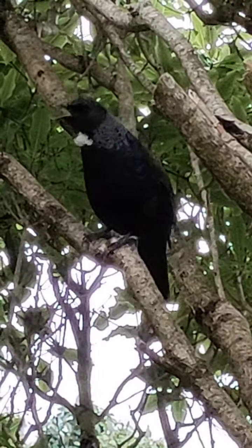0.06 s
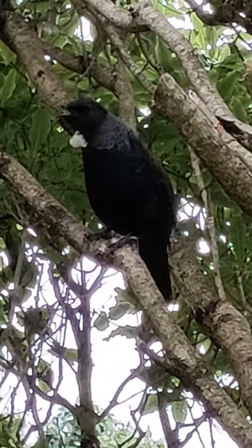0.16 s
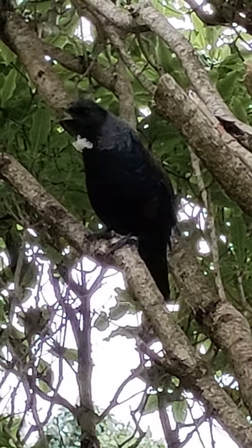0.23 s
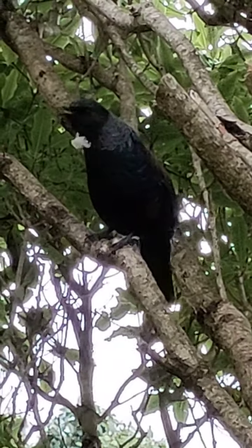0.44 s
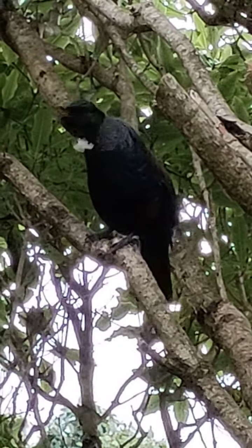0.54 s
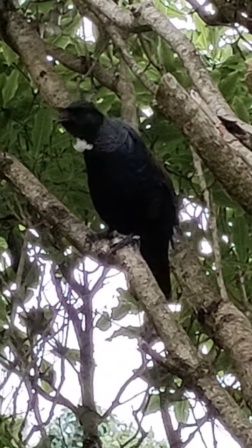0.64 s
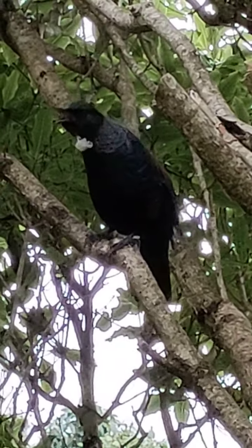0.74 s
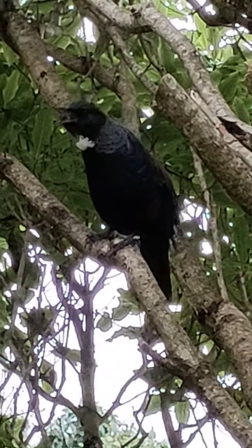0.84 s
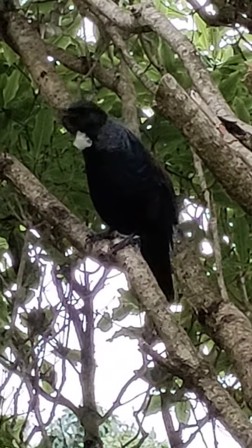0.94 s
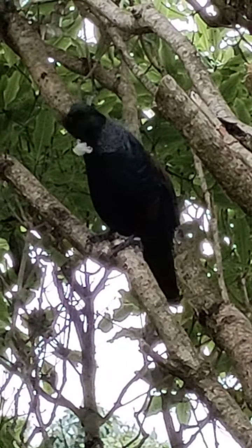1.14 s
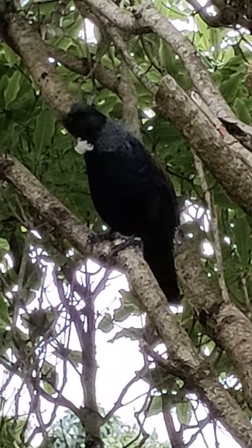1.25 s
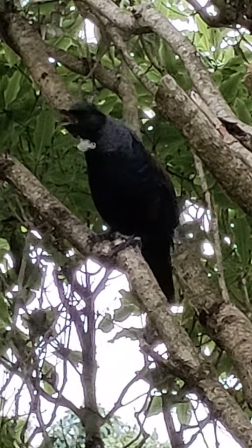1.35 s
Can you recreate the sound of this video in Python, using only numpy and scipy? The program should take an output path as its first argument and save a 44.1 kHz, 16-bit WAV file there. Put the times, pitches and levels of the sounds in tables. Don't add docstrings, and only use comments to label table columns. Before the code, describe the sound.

A perched songbird sings close to a stereo microphone: tiny peeps, a falling sweep, a raspy trilled buzz, gliding flute-like whistles, a bright piercing downward sweep, then two gulps, with short woodland echoes over very faint hush.

```python
import sys
import numpy as np
from scipy import signal
from scipy.fft import rfft, irfft, next_fast_len
from scipy.io import wavfile
from scipy.ndimage import uniform_filter1d

SR = 44100
rng = np.random.default_rng(int(sys.argv[2]) if len(sys.argv) > 2 else 0)


def linear_from_db(decibels):
    return 10 ** (np.asarray(decibels, float) / 20)


def wrap_up_sound(samples):
    columns = np.atleast_2d(samples).T
    tamed = np.clip(columns, -1, 1)
    steps = np.round(tamed * 32767).astype(np.int16)
    wavfile.write(sys.argv[1], SR, steps)


N = 61739


def evened(x):
    return x / np.sqrt(np.mean(x ** 2) + 1e-20)


def read(points, hz):
    point_hz, value = np.transpose(points)
    return np.interp(np.log(hz + 1), np.log(point_hz + 1), value)


def coloured(x, points):
    hz = np.fft.rfftfreq(N, 1 / SR)
    return irfft(rfft(x) * linear_from_db(read(points, hz)), N)


def wobble(hz):
    lowpass = signal.butter(4, hz / (SR / 2), output="sos")
    return evened(signal.sosfilt(lowpass, rng.standard_normal(N)))


# (frequency [Hz], level [dB])
HUSH_SPECTRUM = [(25, -23), (150, -7.5), (340, -13.5), (700, -19), (3200, -26.5), (6500, -23.5),
                 (8500, -47), (15000, -45)]
# (frequency [Hz], correlation [0-1])
HUSH_LIKENESS = [(30, 0.43), (120, 0.17), (400, 0.24), (1500, 0.1), (8000, .1)]
# (time [s], level [dB])
HUSH_SWELL = [(0, -7.5), (0.302, 0.5), (0.701, 2.5), (1.152, 4.5), (1.4, -4.5)]
HUSH_DB, PATCH_DB = -77.5, 1.8


def hush():
    frames, hz = N // 256 + 5, np.fft.rfftfreq(1024, 1 / SR)
    a, b, c, d, patches = rng.standard_normal((frames, 513, 5)).T
    patches = uniform_filter1d(patches, size=8, axis=0)
    patches = evened(uniform_filter1d(patches, size=20, axis=1))
    same = np.clip(read(HUSH_LIKENESS, hz), -1, 1)[:, None]
    left = a + 1j * b
    right = same * left + np.sqrt(1 - same ** 2) * (c + 1j * d)
    z = np.array([left, right]) * linear_from_db(read(HUSH_SPECTRUM, hz)[:, None] + PATCH_DB * patches)
    noise = evened(signal.istft(z, nperseg=1024, noverlap=768)[1][:, :N])
    swell_db = np.interp(np.arange(N) / SR, *np.transpose(HUSH_SWELL))
    return noise * linear_from_db(HUSH_DB + swell_db)


# (frequency [Hz], left minus right [dB])
SHADOW = [(1000, -0.5), (3300, -2.5), (6500, -8), (9000, 0)]


def later(x, delay_s, lean=0):
    size = next_fast_len(N + 4096)
    hz = np.fft.rfftfreq(size, 1 / SR)
    turn = np.exp(-2j * np.pi * hz * delay_s)
    return irfft(rfft(x, size) * turn * linear_from_db(lean * read(SHADOW, hz)), size)[:N]


# (frequency [Hz], gain [dB])
SCATTER = [(700, -3.5), (2500, -4), (4000, -0.5), (6000, 0), (12000, -8)]
# (frequency [Hz], t60 [s])
TREES_T60 = [(500, 0.21), (3000, 0.28), (6000, 0.3), (9000, 0.27), (14000, 0.18)]
# (left delay [s], right delay [s], level [dB])
TRUNKS = [
    (.0064, .0062, -4),
    (.0118, .0105, -8),
    (.021, .023, -13),
]
TREES_DB, GAP_S = -1, 0.008


def trees(song):
    x = coloured(song, SCATTER)
    taps = rng.standard_normal((2, SR // 2))
    hz, t, z = signal.stft(taps, SR, nperseg=128)
    decay = linear_from_db(-60 * t / read(TREES_T60, hz)[:, None])
    tail = signal.istft(z * decay, SR, nperseg=128)[1]
    tail = tail / np.linalg.norm(tail[0])
    wet = signal.fftconvolve(later(x, GAP_S)[None], tail, axes=1)[:, :N]
    near = sum(linear_from_db(db) * np.array([later(x, left_s), later(x, right_s)]) for left_s, right_s, db in TRUNKS)
    return linear_from_db(TREES_DB) * wet + near


def direct(song):
    lag_s = 2.2e-5
    return np.array([later(song, 0, 0.5), later(song, lag_s, -0.5)])


def columns(table, edge_s=0.0016):
    s, *rest = np.transpose(table)
    t = np.arange(N) / SR
    to_edge_s = np.minimum(t - s[0] + edge_s, s[-1] + edge_s - t)
    gate = np.clip(to_edge_s / edge_s, 0, 1) ** 2
    return [uniform_filter1d(np.interp(t, s, c), size=130) for c in rest], gate


CLEAN_DB, CLEAN_JITTER = 0.6, 0.001
ROUGH_DB, ROUGH_JITTER = 3.0, 0.008
BREATHY = 0.55
TOP_JITTER = 0.03


def whistle(table, over_db, rough_db=CLEAN_DB, jitter=CLEAN_JITTER, edge_s=0.0046, breathy=0):
    (hz, db), gate = columns(table, edge_s)
    turn = 2 * np.pi * np.cumsum(hz * (1 + jitter * wobble(400))) / SR
    over = 0
    for k, partial_db in enumerate(over_db, 2):
        over = over + linear_from_db(partial_db) * np.sin(k * turn) * (k * hz < SR / 2.2)
    tone = np.sin(turn) + over * (1 - breathy + breathy * wobble(800))
    return np.sqrt(2) * gate * linear_from_db(db + rough_db * wobble(190)) * tone


# (time [s], frequency [Hz], level [dB], length [s])
PUFFS = [
    (0.59, 389, -72, 0.03),
    (1.031, 333, -67.5, 0.07),
]


def puffs():
    t = np.arange(N) / SR
    out = np.zeros(N)
    for s, hz, db, length_s in PUFFS:
        arch = np.sin(np.pi * np.clip((t - s) / length_s, 0, 1))
        out = out + linear_from_db(db) * arch * np.sin(2 * np.pi * hz * t + wobble(75))
    return out


# (time [s], pitch [Hz], level [dB])
STROKE = [(1.066, 3870, -75), (1.073, 4340, -62.5), (1.081, 4930, -71)]
BURST = [(1.14, 5200, -54), (1.146, 4905, -57.5), (1.153, 4140, -56)]


def sparks():
    return whistle(STROKE, []) + whistle(BURST, [], ROUGH_DB, TOP_JITTER)


# (time [s], pitch [Hz], first partial [dB], second partial [dB])
GULP_1 = [(1.07, 1367, -108, -76), (1.08, 1590, -87, -66), (1.102, 1701, -71.5, -43),
          (1.112, 1082, -58.5, -49), (1.115, 1000, -51, -104), (1.118, 731, -57.5, -78)]
GULP_2 = [(1.128, 1405, -103, -52.5), (1.136, 1643, -70, -47), (1.147, 1713, -74, -43),
          (1.152, 1279, -57.5, -50), (1.156, 1055, -47.5, -100), (1.168, 558, -58, -103)]
GULP_THIRD_DB = [-15, -14]
GULP_OVER_DB = [-34, -38, -33, -29, -32]
GULP_BREATHY = 0.35


def gulp(table, third_db):
    (hz, first_db, second_db), gate = columns(table)
    turn = 2 * np.pi * np.cumsum(hz) / SR
    over_db = [third_db, *GULP_OVER_DB]
    over = sum(linear_from_db(db) * np.sin(k * turn) for k, db in enumerate(over_db, 3))
    upper = np.sin(2 * turn) + over * (1 - GULP_BREATHY + GULP_BREATHY * wobble(600))
    return np.sqrt(2) * gate * (linear_from_db(first_db) * np.sin(turn) + linear_from_db(second_db) * upper)


# (time [s], pitch [Hz], low band [dB], high band [dB])
BUZZ = [(.337, 2482, -53.5, -64), (.356, 2489, -50, -52), (.4, 2428, -47, -51), (.45, 2436, -51.5, -54.5),
        (.5, 2443, -50.5, -49), (.522, 2472, -51.5, -70.5), (.535, 2516, -88, -67)]
# (start [s], low band lift [dB], high band lift [dB])
BEATS = [(0.334, -2, -4.5), (.365, 1.5, -0.5), (.394, -1, 1.5), (.426, 3, -1), (0.456, -1, 3),
         (.487, 0, -1), (0.513, 3.5, 5), (.545, -2, -2)]
# (multiple of pitch [1], level re high band [dB])
BUZZ_TOP = [(3.6, -6), (4, -16.5), (4.6, -16.5), (5, -22), (6, -34.5)]
BUZZ_JITTER = 0.019
TRILL_DEPTH, TRILL_DB, FLICKER_DB = 0.08, 8, 3.8
LATE = 2.4


def buzz():
    (hz, low_db, high_db), gate = columns(BUZZ)
    s, low_lift, high_lift = np.transpose(BEATS)
    count = np.interp(np.arange(N) / SR, s, np.arange(len(s)))
    beat, which = count % 1, count.astype(int)
    sag = TRILL_DEPTH * uniform_filter1d(0.5 - beat, size=200)
    low_turn = 2 * np.pi * np.cumsum(hz * (1 + sag + BUZZ_JITTER * wobble(138))) / SR
    top_turn = 2 * np.pi * np.cumsum(hz * (1 + sag + TOP_JITTER * wobble(138))) / SR
    swell_db = TRILL_DB * np.sin(np.pi * beat ** LATE)
    low_db = low_db + low_lift[which] + swell_db - 5.5 + FLICKER_DB * wobble(230)
    high_db = high_db + high_lift[which] - swell_db + FLICKER_DB * wobble(620)
    partials = sum(linear_from_db(db - 5.5) * np.sin(k * top_turn) for k, db in BUZZ_TOP)
    top = np.sin(3 * top_turn) + linear_from_db(0.67 * swell_db) * partials
    return gate * (linear_from_db(low_db) * np.sin(2 * low_turn) + linear_from_db(high_db) * top)


# (time [s], pitch [Hz], level [dB])
WISP_1 = [(0, 4000, -76.5), (.014, 3854, -72), (.03, 3905, -80.5), (.042, 3640, -88)]
WISP_2 = [(0.15, 3840, -88), (0.168, 4130, -77.5), (0.18, 4310, -69.5), (0.19, 3970, -95)]
FLUTE = [(0.62, 3070, -91), (0.636, 3370, -62), (0.642, 3283, -57), (0.702, 3351, -48),
         (0.712, 3394, -63.5), (0.73, 3860, -55), (0.742, 4100, -73.5)]
GLIDE = [(.734, 1945, -83.5), (.746, 2300, -56.5), (.758, 2414, -58), (.822, 2407, -62.5), (.87, 2201, -62),
         (.915, 2182, -56), (.935, 2060, -63), (.96, 1798, -63.5), (.978, 1659, -72.5)]
FAINT = [(.635, 3760, -76.5), (.66, 3910, -76), (.7, 4070, -76.5), (.715, 4600, -92.5)]
# (time [s], level [dB])
GLIDE_SECOND = [(.745, -5.5), (.77, -14.5), (.82, 4), (.86, -3.5), (.9, 1), (.93, -2.5), (.945, 2.5),
                (.98, -7)]


def low_side():
    second_db = np.interp(np.arange(N) / SR, *np.transpose(GLIDE_SECOND))
    wisps = whistle(WISP_1, [-3, -8]) + whistle(WISP_2, [-6, -30])
    flute = whistle(FLUTE, [-35, -35, -30]) + whistle(FAINT, [], ROUGH_DB, TOP_JITTER)
    return wisps + flute + whistle(GLIDE, [second_db, -19, -30, -30, -40])


# (time [s], pitch [Hz], level [dB])
PEEP = [(.043, 6550, -56.5), (.05, 6580, -51), (.056, 6480, -52), (.061, 5920, -67.5), (.075, 5810, -94)]
PEEP_ECHO = [(0.082, 6500, -84), (0.094, 6620, -67), (0.1, 6120, -84.5)]
MURMUR = [(0.087, 4770, -100), (0.095, 4610, -74), (0.115, 4330, -101)]
SWEEP_1 = [(.189, 7180, -80), (.198, 6620, -60.5), (.214, 6290, -46), (.224, 5770, -46.5),
           (.236, 4915, -45.5), (.248, 4890, -47), (.258, 4530, -61.5), (.272, 4130, -63.5)]
SWEEP_SOFT = [(.304, 6400, -77), (.313, 6000, -62.5), (.322, 5150, -59), (.332, 5000, -57)]
CLIMB = [(.618, 4450, -74), (.65, 5410, -53), (.672, 5590, -51), (.69, 5990, -50), (.708, 6530, -62.5),
         (.72, 7480, -75.5), (.74, 8300, -83.5)]
SHRILL = [(.735, 8600, -86.5), (.749, 8430, -65), (.769, 8700, -61.5), (.803, 8500, -64.5),
          (.812, 8600, -69.5)]
CREST = [(.8, 9140, -95.5), (.816, 10200, -64.5), (.838, 9920, -80), (.85, 9070, -58.5),
         (.875, 8875, -50.5), (.895, 8840, -44), (.905, 8650, -76)]
SWEEP_2 = [(.905, 9000, -72.5), (.913, 8870, -43.5), (.925, 8270, -50.5), (.941, 7400, -41.5),
           (.951, 7070, -42), (.967, 6410, -31.5), (.974, 5725, -38.5), (.982, 5083, -40.5),
           (.986, 4600, -64.5)]
# (time [s], pitch [Hz], level [dB])
CLICK = [(.336, 7250, -47), (.3395, 7110, -39)]
SNAP = [(.4935, 7470, -62.5), (.496, 7534, -37)]


def high_side():
    peeps = whistle(PEEP, [-38], edge_s=0.0019) + whistle(PEEP_ECHO, []) + whistle(MURMUR, [])
    sweeps = (whistle(SWEEP_1, [-32], breathy=BREATHY) + whistle(SWEEP_SOFT, [-11], breathy=BREATHY)
              + whistle(SWEEP_2, [-26], breathy=BREATHY))
    snaps = whistle(CLICK, [], edge_s=0.0016) + whistle(SNAP, [], edge_s=0.0013)
    climb = (whistle(CLIMB, [-31], ROUGH_DB, ROUGH_JITTER) + whistle(SHRILL, [], ROUGH_DB)
             + whistle(CREST, [], ROUGH_DB))
    return peeps + sweeps + snaps + climb


SUM_DB, DIFFERENCE_DB, SPLIT_HZ = 41, 12, 8800


def windpipe(high):
    swing = whistle(GLIDE, [-14]) + linear_from_db(-20) * whistle(FLUTE, [])
    product = swing * high
    highpass = signal.butter(6, SPLIT_HZ / (SR / 2), "high", output="sos")
    sums = signal.sosfiltfilt(highpass, product)
    return linear_from_db(SUM_DB) * sums + linear_from_db(DIFFERENCE_DB) * (product - sums)


def bird():
    high = high_side()
    whistles = low_side() + high + windpipe(high)
    gulps = gulp(GULP_1, GULP_THIRD_DB[0]) + gulp(GULP_2, GULP_THIRD_DB[1])
    return whistles + buzz() + gulps + puffs() + sparks()


# (frequency [Hz], gain [dB])
PRESENCE = [(9000, -0.5), (12500, 2), (15000, 5)]


def scene():
    song = coloured(bird(), PRESENCE)
    return direct(song) + trees(song) + hush()


def top_cut(x):
    return signal.sosfilt(signal.butter(12, 15800, fs=SR, output="sos"), x)


def record(dry):
    return top_cut(dry)


dry = scene()
out = record(dry)
wrap_up_sound(out)
```